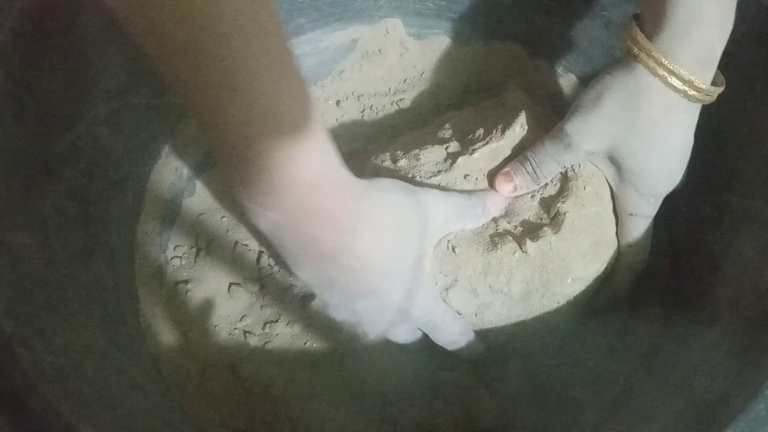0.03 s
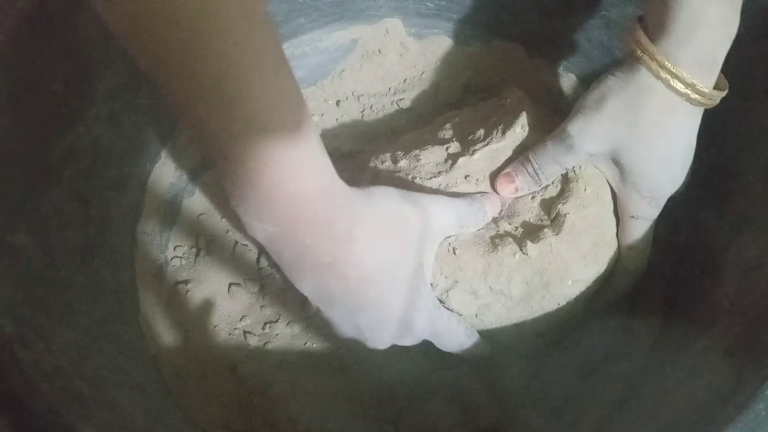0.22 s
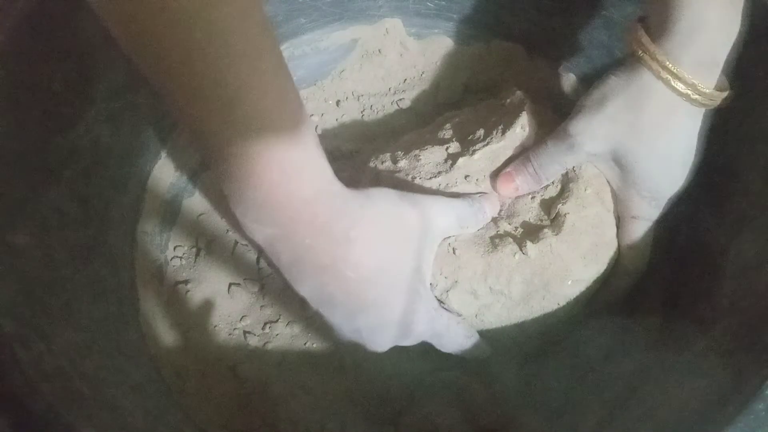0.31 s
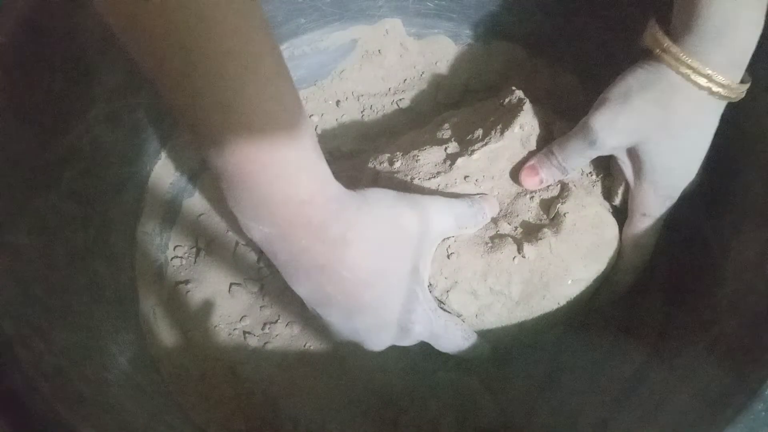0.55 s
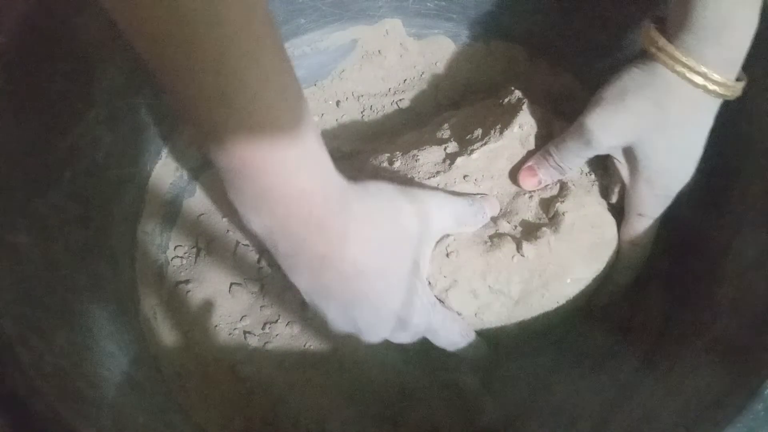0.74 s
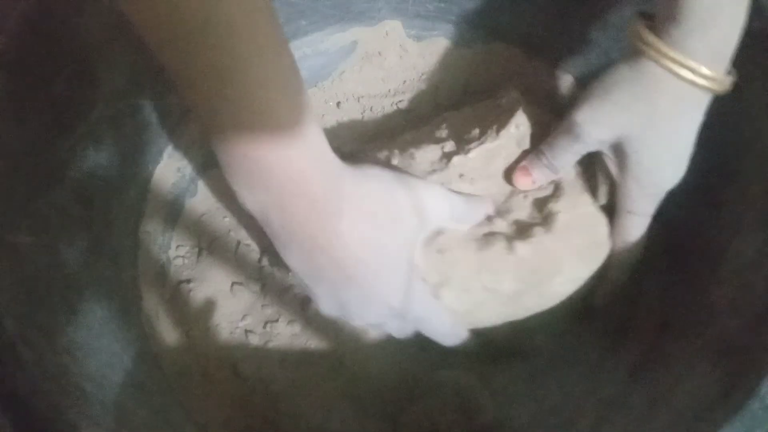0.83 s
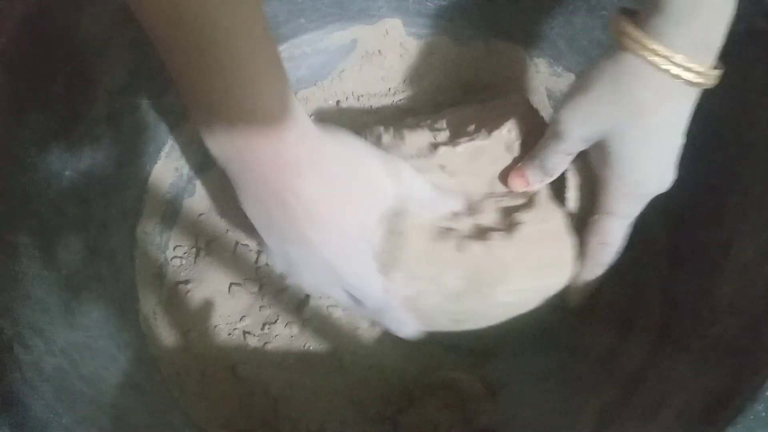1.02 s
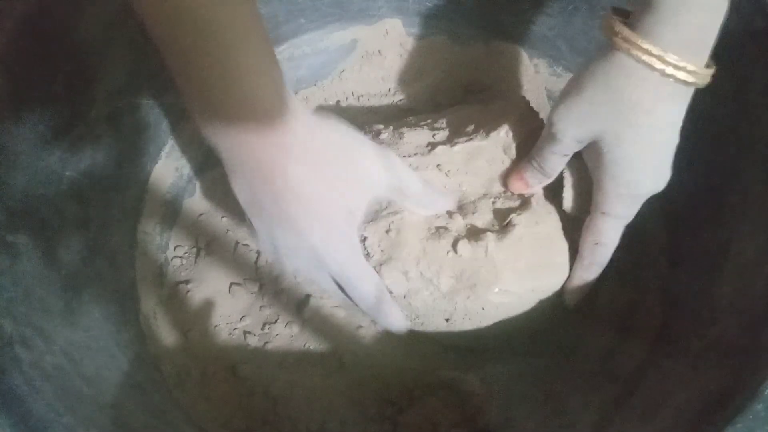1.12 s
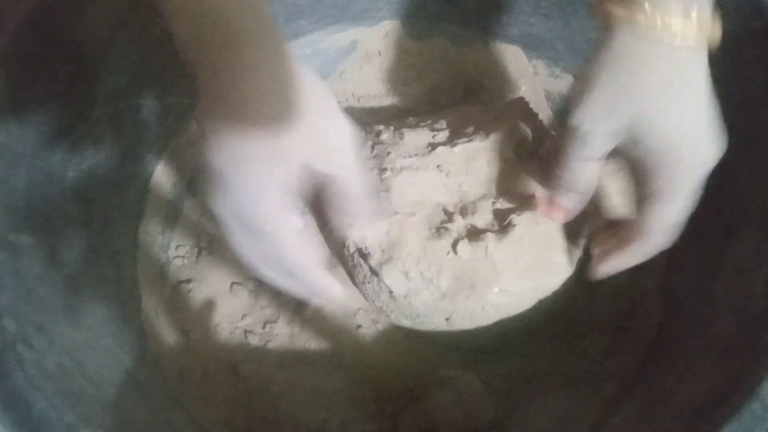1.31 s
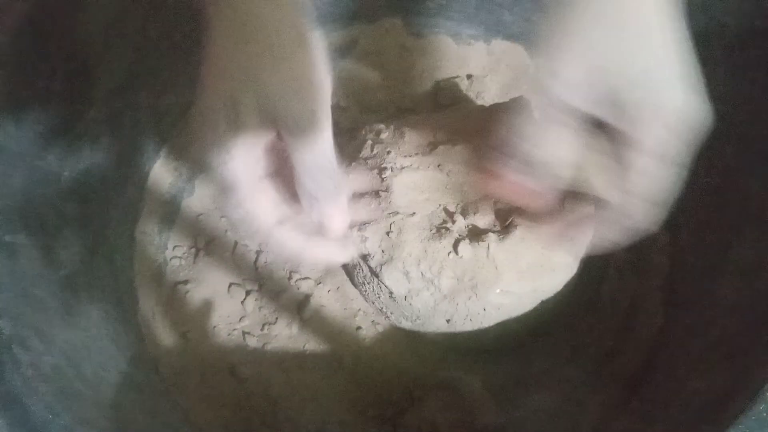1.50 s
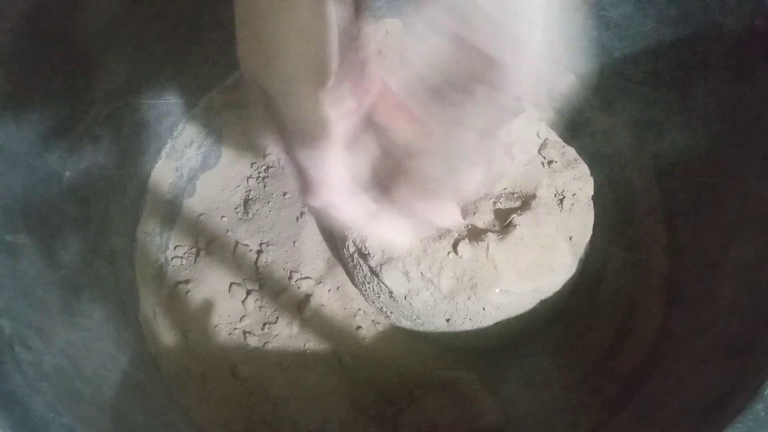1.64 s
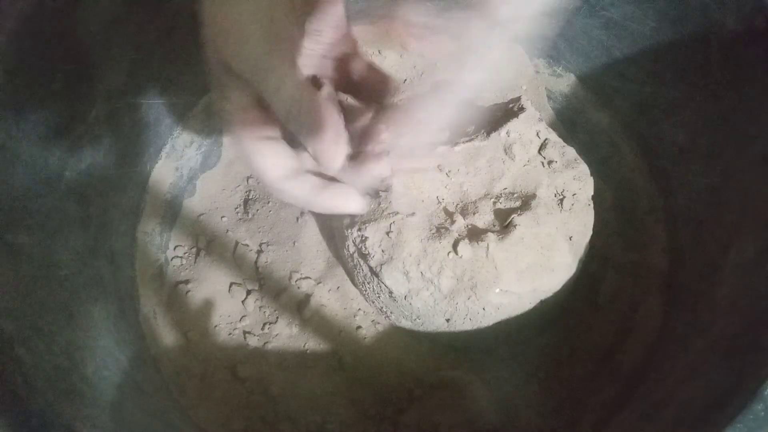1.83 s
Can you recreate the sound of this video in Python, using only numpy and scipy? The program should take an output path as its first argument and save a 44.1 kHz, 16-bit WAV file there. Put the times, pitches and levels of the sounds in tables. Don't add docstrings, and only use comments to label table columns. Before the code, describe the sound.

A cake of dry sand cracks and crumbles under hands in a plastic tub, then scrapes softly

```python
import sys
import numpy as np
from scipy import signal
from scipy.io import wavfile
from scipy.ndimage import uniform_filter1d

SR = 44100
rng = np.random.default_rng(int(sys.argv[2]) if len(sys.argv) > 2 else 0)


def undo_db(level):
    steps = np.asarray(level, float) / 20
    return 10 ** steps


def digitize_waveform(pressure):
    field = np.atleast_2d(pressure).T
    bounded = np.clip(field, -1, 1)
    quanta = np.round(bounded * 32767).astype(np.int16)
    wavfile.write(sys.argv[1], SR, quanta)


N = 81585


def evened(x):
    return x / np.sqrt(np.mean(x ** 2) + 1e-20)


def read(points, hz):
    f, value = np.transpose(points)
    return np.interp(np.log(hz + 1), np.log(f + 1), value)


def taps(points):
    hz = np.abs(np.fft.fftfreq(4096, 1 / SR))
    log_gain = np.log(undo_db(read(points, hz)))
    h = np.fft.ifft(np.exp(np.conj(signal.hilbert(log_gain)))).real[:2048]
    return h / np.linalg.norm(h)


def add(mix, s, sound):
    part = mix[round(s * SR):][:len(sound)]
    part += sound[:len(part)]


def ring(x, hz, width_hz):
    r = np.exp(-np.pi * width_hz / SR)
    return signal.lfilter([1 - r, 0, r - 1], [1, -2 * r * np.cos(2 * np.pi * hz / SR), r * r], x)


def patchy(points, patch_db, size):
    hz = np.fft.rfftfreq(size, 1 / SR)
    frames = N // (size // 4) + 5
    a, b, p = rng.standard_normal((frames, len(hz), 3)).T
    p = uniform_filter1d(p, size=10, axis=0)
    p = evened(uniform_filter1d(p, size=8, axis=1))
    z = (a + 1j * b) * undo_db(read(points, hz)[:, None] + patch_db * p)
    noise = signal.istft(z, nperseg=size, noverlap=3 * size // 4)[1]
    return evened(noise[:N])


# f/Hz, level/dB
HUM_SPECTRUM = [(18, -71.5), (30, -41), (59, -8), (142, -2.5), (172, -6), (310, -11.5), (593, -24),
                (700, -48), (1100, -43.5), (1430, -78), (2420, -120)]
# f/Hz, level/dB
AIR_SPECTRUM = [(700, 3.5), (1500, 2.5), (3000, -8), (5000, -7), (7500, -1), (9000, -22.5), (11000, 1),
                (14000, -13.5)]
HUM_DB, AIR_DB = -58.5, -94


def room():
    hum = patchy(HUM_SPECTRUM, patch_db=1, size=2048)
    air = patchy(AIR_SPECTRUM, patch_db=4, size=1024)
    return undo_db(HUM_DB) * hum + undo_db(AIR_DB) * air


# t/s, length/s, level/dB, f/Hz, dust/dB
RUSTLE_SWELLS = [(2.1, 0.057, -88.5, 3030, -5.5), (1.428, 0.037, -89, 5050, 1), (1.6, 0.059, -94, 3120, -7.5),
                 (1.51, 0.058, -85, 4720, 5.5), (1.545, 0.05, -84, 4840, -4.5), (1.585, 0.016, -85, 4580, 11.5),
                 (1.634, 0.056, -89.5, 4810, 3), (1.77, .055, -89, 4540, 2), (1.14, 0.075, -74, 1980, -9),
                 (1, 0.071, -77.5, 1450, -20.5), (0.64, 0.031, -70, 2200, -8), (1.519, 0.019, -86, 10000, 9),
                 (1.39, .07, -89, 6500, 0)]
# f/Hz, level/dB
DUST_SPECTRUM = [(1500, -43), (3500, -12), (4500, -4.5), (7000, 1), (8500, -8.5), (10500, -5), (13000, -7),
                 (16000, -6.5)]
RUSTLE_WIDTH_HZ = 640


def rustles():
    out, dust = np.zeros(N), taps(DUST_SPECTRUM)
    noises = rng.standard_normal((len(RUSTLE_SWELLS), 2, 4000))
    for (s, length_s, level_db, hz, dust_db), noise in zip(RUSTLE_SWELLS, noises):
        band = evened(ring(ring(noise[0], hz, RUSTLE_WIDTH_HZ), hz, RUSTLE_WIDTH_HZ))
        fine = signal.oaconvolve(noise[1], dust)[:len(band)]
        t = np.arange(len(band)) / SR
        swell = np.sin(np.pi * np.minimum(t / length_s, 1)) ** 2
        add(out, s, undo_db(level_db) * swell * (band + undo_db(dust_db) * fine))
    return out


def grains(points, per_s, spread_db):
    u, e, g = rng.random(N), rng.exponential(1, N), rng.standard_normal(N)
    strike = np.clip((per_s / SR - u) * 300, 0, 1)
    clicks = strike * undo_db(spread_db * np.minimum(e, 5)) * np.sign(g)
    return evened(signal.oaconvolve(clicks, taps(points))[:N])


RUB_HZ, RUB_WIDTH_HZ, RUB_DB = 580, 136, -57
RUB_START_S, RUB_END_S, RUB_EDGE_S = 0.733, 1.033, 0.036
PALM_HZ, PALM_DB = 423, -3


def palm_rub():
    t = np.arange(N) / SR
    press = np.clip(np.minimum(t - RUB_START_S, RUB_END_S - t) / RUB_EDGE_S, 0, 1)
    skin = rng.standard_normal(N)
    rub = evened(ring(ring(skin, RUB_HZ, RUB_WIDTH_HZ * 2), RUB_HZ, RUB_WIDTH_HZ))
    palm = evened(ring(ring(skin, PALM_HZ, RUB_WIDTH_HZ * 2), PALM_HZ, RUB_WIDTH_HZ * 2))
    return press * (rub + undo_db(PALM_DB) * palm)


# t/s, drag/dB, fineness/dB
FINGER_DRAG = [(0, -74.5, -2), (.09, -88, -4), (0.192, -95, 18), (.203, -59, 18.5), (.3, -49, -0.5),
               (.4, -67, 5), (0.426, -53, -6), (.53, -73, 0), (.61, -66, -7), (0.649, -69.5, 9.5),
               (0.739, -69, 14.5), (0.762, -58, 3.5), (.95, -54.5, 6), (1.015, -59, 9), (1.05, -69, 13),
               (1.189, -73.5, 4), (1.27, -89.5, 8), (1.85, -97.5, 8.5)]
# t/s, length/s, extra/dB
STICK_SLIPS = [
    (0.755, 0.047, 2.5),
    (0.827, .016, 4.5),
    (0.856, 0.01, 6),
    (0.896, 0.037, 4),
    (0.942, 0.013, 6),
]
# f/Hz, level/dB
SCRAPE_SPECTRUM = [(300, -50.5), (700, -1.5), (1000, 3), (1600, 4.5), (2500, -2.5), (3400, -8.5),
                   (4200, -12), (8000, -38)]
# f/Hz, level/dB
SIFT_SPECTRUM = [(600, -31), (2500, 1.5), (4000, -9), (6500, 0), (8000, -9.5), (11000, -4.5), (13500, -7),
                 (17000, -15.5)]
SIFT_DB, SIFT_FOLLOW = -32, 0.74
CLUMP_DB, CLUMP_S, SLIP_EDGE_S = 1.3, 0.016, 0.0032


def fingers():
    t = np.arange(N) / SR
    drag_s, drag_db, fine_db = np.transpose(FINGER_DRAG)
    slip = np.zeros(N)
    for s, length_s, extra_db in STICK_SLIPS:
        slip += extra_db * np.clip(np.minimum(t - s, s + length_s - t) / SLIP_EDGE_S, 0, 1)
    drag = np.interp(t, drag_s, drag_db) + slip
    fine = np.interp(t, drag_s, fine_db)
    k = np.hanning(int(CLUMP_S * SR))
    clump, lurch = CLUMP_DB * evened(signal.oaconvolve(rng.standard_normal((2, N)), k[None], "same"))
    scrape = grains(SCRAPE_SPECTRUM, per_s=3500, spread_db=2)
    sift = grains(SIFT_SPECTRUM, per_s=4000, spread_db=1.5)
    out = undo_db(drag + clump) * scrape
    out += undo_db(RUB_DB + slip + 0.55 * lurch) * palm_rub()
    return out + undo_db(SIFT_DB + SIFT_FOLLOW * drag + fine + 0.14 * clump) * sift


# t/s, level/dB, push f/Hz, ring/dB, length/cycles
KNOCKS = [(0.1997, -38.5, 123, -12.5, 2.2), (0.2096, -26.5, 300, -2.5, 2.3), (0.2414, -32.5, 167, 0, 0.69),
          (0.2494, -23.5, 266, -0.5, 0.81), (0.2544, -26, 92, -6, .8), (0.2652, -29, 110, -6.5, 1.6),
          (0.301, -16, 268, -11.5, 0.73), (0.305, -21, 140.4, -31, 0.77), (0.3116, -31, 300, -6, 0.53),
          (0.4104, -39.5, 220, 5.5, 1), (.4102, -32.5, 512, -30.5, 3)]
# f/Hz, level/dB, t60/s
TUB_MODES = [(98, 2, 0.09), (180, 0, 0.079), (153.3, -5, 0.24), (300, -10, 0.11)]
PUSH_SAG = 0.72


def thud(level_db, push_hz, ring_db, cycles):
    t = np.arange(SR // 3) / SR
    u = t * push_hz
    push = -np.sin(2 * np.pi * u ** PUSH_SAG) * np.exp(-(u / cycles) ** 2) * np.minimum(u / 0.19, 1)
    modes = sum(undo_db(db - 60 * t / t60) * np.sin(2 * np.pi * hz * t) for hz, db, t60 in TUB_MODES)
    tub = -modes * np.minimum(u, 1)
    return undo_db(level_db) * (2 * push + undo_db(ring_db) * tub)


# t/s, level/dB, f/Hz, length/cycles
GRAIN_BURSTS = [(.5531, -38.5, 2600, .7), (.8557, -37.5, 2200, .7), (.8346, -41, 1300, .7),
                (.2876, -31, 1500, .9), (.0455, -56, 2200, .8), (.9761, -48, 1800, .7),
                (1.0612, -55, 2400, .8), (.7752, -49, 2500, .7), (.5612, -56, 1400, .8),
                (.5712, -57, 1500, .8), (1.1852, -63, 4000, .8), (.3361, -29, 900, 1.3),
                (.5891, -60, 2200, .8), (.6261, -60, 2000, .8), (.6481, -57, 2400, .8),
                (.6641, -59, 2200, .8)]


def tick(level_db, hz, cycles):
    return -thud(level_db, hz, -80, cycles)[:SR // 100]


# t/s, level/dB, brightness/(dB/octave), pitch ratio, t60 ratio
CAKE_CRACKS = [
    (0.2378, -25, 8.5, 1.005, 0.95),
    (.2428, -28, 8, 1.07, 1.1),
    (0.2453, -27, 10, 1.05, .9),
    (.2488, -33.5, 3, 1.03, .8),
    (.2858, -34.5, 5.5, 1.02, 0.55),
    (.3348, -31.5, 3.5, 0.87, 0.48),
    (.409, -16.5, 2.5, 0.993, 0.98),
    (.5533, -52, 8, 0.89, 0.4),
    (.5746, -49.5, 12, 1.07, 0.45),
    (.178, -55, -3, 1.05, 0.74),
]
# f/Hz, level/dB, t60/s
CAKE_MODES = [(846.5, 1, .018), (1247, -13.5, 0.03004), (1552, -12, 0.041), (2020, -5.5, 0.017),
              (2184, -16.5, 0.0079), (2690, -19, .014), (2870, -14.5, .014), (3210, -14, 0.0058),
              (3760, -30, 0.017), (5560, -28.5, 0.0097)]
CAKE_RISE_CYCLES = 3.3


def crack(level_db, bright_db, pitch, ringing):
    t = np.arange(SR // 20) / SR
    hz, db, t60 = np.transpose(CAKE_MODES)[:, :, None]
    u = t * hz * pitch
    fall = np.maximum(t - CAKE_RISE_CYCLES / hz / pitch, 0) / (t60 * ringing)
    rise = np.sin(np.pi / 2 * np.minimum(u / CAKE_RISE_CYCLES, 1)) ** 2
    modes = undo_db(db + bright_db * np.log2(hz / hz[0]) - 60 * fall) * rise
    return -undo_db(level_db - 3.5) * (modes * np.sin(2 * np.pi * u)).sum(axis=0)


LUMP_Q, KICK_DB, GRIT_DB, DUST_DB, CRACK_DB = 3.5, -9.5, 1, -8, 10.5
TAIL_DB, TAIL_S = -26, 0.012
RISE_SHARE, SNAP_FALL = 0.036, 0.99
KNOCK_PER_DB, FULL_KNOCK_DB = 0.53, -19


def snap(noise, grit, dust, level_db, length_s, lump_hz, dust_db):
    t = np.arange(noise.shape[1]) / SR
    burst = np.minimum(t / (RISE_SHARE * length_s), 1) * np.exp(-(t / length_s) ** 2 / SNAP_FALL)
    kick = -undo_db(KICK_DB) * np.sin(2 * np.pi * lump_hz * t) * np.minimum(t * lump_hz, 1)
    lump = ring(ring((noise[0] + kick) * burst, lump_hz, lump_hz), lump_hz, lump_hz / LUMP_Q)
    scatter = noise[1] * (burst + undo_db(TAIL_DB) * np.exp(-t / TAIL_S))
    scatter[0] = -undo_db(CRACK_DB)
    loose = signal.oaconvolve(scatter, grit)[:len(t)]
    fine = signal.oaconvolve(noise[2] * burst, dust)[:len(t)]
    knock_db = KNOCK_PER_DB * (level_db - FULL_KNOCK_DB)
    parts = (lump, knock_db), (loose, GRIT_DB), (fine, DUST_DB + dust_db)
    return undo_db(level_db + 1) * sum(undo_db(db) * x / np.abs(x).max() for x, db in parts)


# t/s, level/dB, length/s, lump f/Hz, dust/dB
CRUST_SNAPS = [(.030, -61, 0.0045, 910, -18), (.045, -58.5, 0.0066, 1970, -24),
               (.1785, -50, 0.0033, 1080, -1), (.2012, -56.5, 0.0061, 900, 11.5),
               (.2085, -50, 0.0045, 1210, -40), (.238, -25.5, 0.0018, 3750, 0.5),
               (.242, -26, 0.0065, 1610, 2.5), (.2462, -30, 0.004, 794, -2.5),
               (.2545, -44.5, .005, 1498, 11), (.2862, -37, 0.0034, 1580, -5),
               (.2985, -33.5, 0.0043, 1790, -3.5), (.3356, -30.5, 0.0015, 2620, -5.5),
               (.3505, -43, 0.0017, 2200, 8), (.3725, -38, 0.0024, 1898, 2.5),
               (.4092, -36, 0.0035, 3000, 6), (.4425, -44, 0.003, 1390, -14.5),
               (.4525, -47.5, .003, 1400, -1.5), (.4635, -40, 0.0016, 1970, -1),
               (.4765, -44, 0.0015, 1500, -12), (.488, -45.5, 0.0045, 1120, 4.5),
               (.4948, -43, .002, 1030, -3), (.505, -51, 0.0029, 1300, 3), (.5533, -46.5, 0.0026, 1700, 4),
               (.5748, -45, 0.005, 1750, -4.5),
               (0.607, -62, 0.0013, 920, 0), (0.653, -54, 0.005, 1880, -11), (0.727, -61, 0.0026, 2970, 5),
               (0.757, -43.5, 0.0022, 1410, -13), (0.768, -46.5, 0.019, 620, -13),
               (0.8338, -41, 0.0013, 580, -17), (0.856, -41.5, 0.0031, 1730, 2.5),
               (0.895, -43.5, 0.024, 1494, -7), (0.9355, -42.5, 0.018, 559, -2.5),
               (.3065, -56, .002, 2500, 11), (.3145, -58, .002, 1500, 11), (.3455, -54, .002, 3500, 7),
               (.3635, -49, .002, 2500, 0), (.392, -67, 0.0024, 2495, 4), (.399, -60, 0.0051, 2500, 3),
               (.2382, -29.5, 0.011, 4480, -18)]
# f/Hz, level/dB
GRIT_SPECTRUM = [(300, -18), (800, -3.5), (2000, -6), (3400, -12.5), (4200, -28.5), (7000, -33.5),
                 (9000, -63)]


def crust():
    out, grit, dust = np.zeros(N), taps(GRIT_SPECTRUM), taps(DUST_SPECTRUM)
    rows = CRUST_SNAPS
    for row, noise in zip(rows, rng.standard_normal((len(rows), 3, 4000))):
        add(out, row[0], snap(noise, grit, dust, *row[1:]))
    return out


def scene():
    mix = room() + rustles() + fingers()
    for table, sound in (KNOCKS, thud), (GRAIN_BURSTS, tick), (CAKE_CRACKS, crack):
        for row in table:
            add(mix, row[0], sound(*row[1:]))
    return (mix + crust())[None]


def low_pass(x):
    return signal.sosfilt(signal.butter(12, 17000, fs=SR, output="sos"), x)


# f/Hz, level/dB
PORT_SPECTRUM = [(13300, -1), (14200, 10.5), (14800, 20), (15300, 20), (15800, 22.5)]
LOW_CUT_HZ, EDGE_HZ = 73.4, 15760


def record(dry):
    h = taps(PORT_SPECTRUM)
    port = signal.oaconvolve(dry, h[None] / h.sum())[:, :N]
    cut = signal.sosfilt(signal.butter(2, LOW_CUT_HZ, "high", fs=SR, output="sos"), port)
    edge = signal.firwin(801, EDGE_HZ, window=("kaiser", 6), fs=SR)
    return low_pass(signal.oaconvolve(cut, edge[None], "same"))


dry = scene()
out = record(dry)
digitize_waveform(out)
```